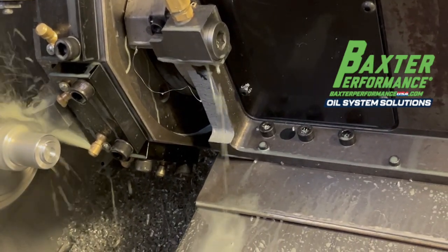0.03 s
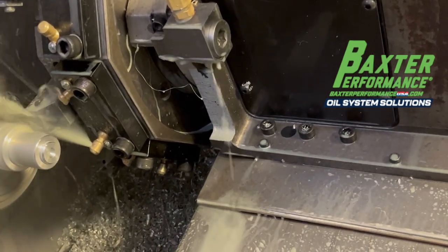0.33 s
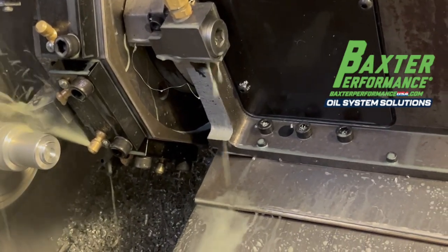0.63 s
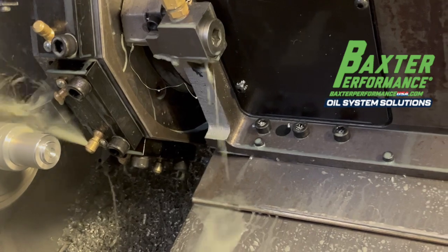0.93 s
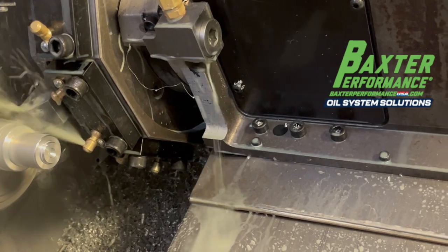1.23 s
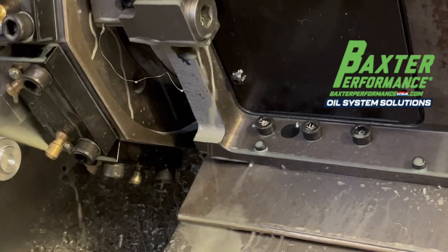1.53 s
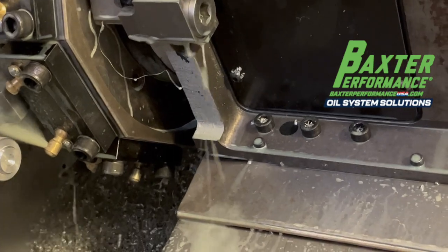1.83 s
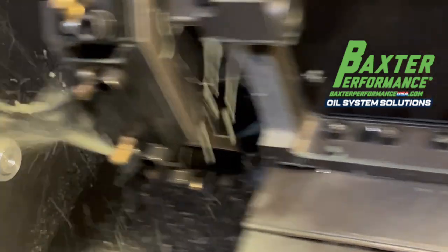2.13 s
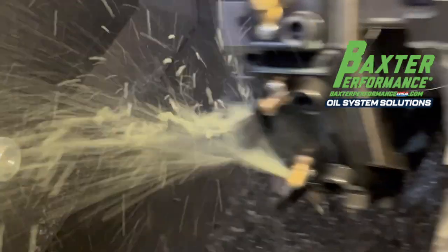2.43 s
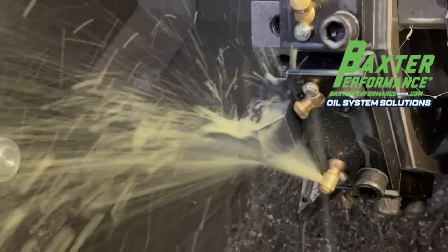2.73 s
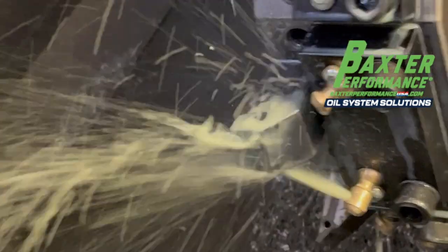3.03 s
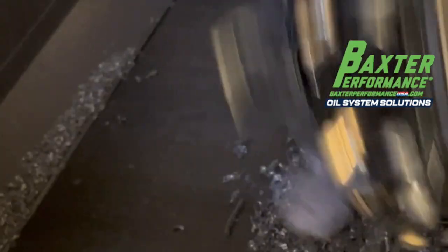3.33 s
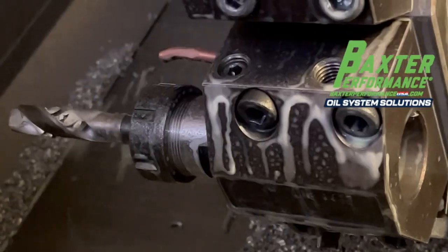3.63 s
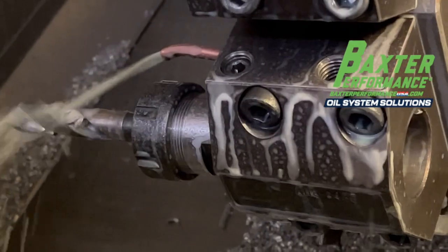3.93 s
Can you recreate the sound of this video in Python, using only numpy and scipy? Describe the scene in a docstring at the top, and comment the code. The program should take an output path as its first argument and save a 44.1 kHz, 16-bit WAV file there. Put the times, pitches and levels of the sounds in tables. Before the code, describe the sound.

Close inside a metal enclosure, a running lathe drones and whines as coolant sprays and a tool scrapes lightly. After a short squeal and a rumble comes a loud double clunk, then the hiss fades amid soft thuds.

```python
"""Inside a CNC lathe, on a close microphone pair. Two motors beat against each other under a pump whine,
while a tool cuts lightly in a jet of coolant. At 1.5 s the tool leaves the part with a squeal, the slide
backs away with a rumble and the jet fans out over the sheet-metal enclosure. At 2.3 s the turret unlocks
with a double clunk, and the recorder's gain dips. The jet's hiss dies down as the turret swings to the
next tool and seats with dull thuds."""
import sys
import numpy as np
from scipy import signal
from scipy.fft import rfft, irfft
from scipy.io import wavfile
from scipy.ndimage import uniform_filter1d, minimum_filter1d

SR = 44100
rng = np.random.default_rng(int(sys.argv[2]) if len(sys.argv) > 2 else 0)


def persist_wave(psi):
    """Save psi, clipped to +-1, as 16-bit WAV."""
    counts = np.round(np.clip(psi, -1, 1) * 32767).astype(np.int16)
    wavfile.write(sys.argv[1], SR, np.atleast_2d(counts).T)


N = 176400
TIME, FREQ = np.arange(N) / SR, np.fft.rfftfreq(N, 1 / SR)


def amp(db):
    """Decibels to gain."""
    return 10 ** (np.asarray(db) / 20)


def at_hz(points, hz=FREQ):
    """Reads a table on a log-frequency axis."""
    f, value = np.transpose(points)
    return np.interp(np.log(hz + 1), np.log(f + 1), value)


def fader(points):
    """Gain over time from (time [s], level [dB]) points."""
    return amp(np.interp(TIME, *np.transpose(points)))


def resonances(rows):
    """Gain over frequency of a few resonant peaks."""
    return sum(amp(db) / (1 + ((FREQ - hz) / (.78 * width)) ** 2) for hz, width, db in rows)


def shape(x, gain):
    """Filters by a gain over frequency."""
    return irfft(rfft(x) * gain, N)


def white():
    """Two unrelated noises of 0 dB/Hz: one shared by the microphones, one diffuse."""
    return rng.standard_normal((2, N)) * np.sqrt(SR / 2)


def wander(rate_hz):
    """Smooth random motion of unit size."""
    x = shape(rng.standard_normal(N), np.exp(-(FREQ / rate_hz) ** 2) * (FREQ > 0))
    return x / x.std()


def arch(start, length):
    """A smooth rise and fall."""
    return np.sin(np.pi * np.clip((TIME - start) / length, 0, 1))


def add(mix, start, sound):
    """Mixes a sound in at a time in seconds."""
    part = mix[:, round(start * SR):][:, :sound.shape[1]]
    part += sound[:, :part.shape[1]]


def ahead(sound):
    """A source straight ahead: all shared, nothing diffuse."""
    return np.array([sound, np.zeros(N)])


def tone(hz, db=0, waver_db=2.5, drift_turns=.048):
    """A machine tone that wavers a little in level and pitch."""
    turns = hz * TIME + rng.random() + drift_turns * wander(rate_hz=4.4)
    return np.sqrt(2) * amp(db + waver_db * wander(rate_hz=4.4)) * np.sin(2 * np.pi * turns)


# machine and workshop all around: (frequency [Hz], level [dB/Hz])
ROAR_SPECTRUM = [(15, -80), (35, -80), (70, -57), (150, -61.5), (260, -60.5), (480, -62.5), (750, -65.5),
                 (1100, -70.5), (2000, -72), (2700, -72), (3600, -72), (4900, -69), (5800, -77.5),
                 (6800, -81.5), (7600, -84), (9500, -86.5), (15500, -89)]

def workshop():
    """A steady roar with a slight flutter."""
    return shape(white(), amp(at_hz(ROAR_SPECTRUM))) * amp(.5 * wander(rate_hz=24))


# hum of the frame: (time [s], level [dB])
FRAME_LEVEL = [(0.0, -34), (0.15, -27), (0.37, -38.5), (0.7, -24.5), (1.22, -38.5), (1.44, -28.5),
               (1.68, -32), (1.8, -28.5), (1.95, -24), (2.15, -31.5), (2.5, -40), (3.22, -24.5),
               (3.73, -35), (4.0, -30.5)]
# steady tones of drives and pump: (pitch [Hz], level [dB])
HUM_TONES = [(119.7, -48.5), (251, -55.5), (268.2, -45.5), (278.9, -52.5), (329.9, -42.5), (361.5, -45.5),
             (411.7, -50), (430.4, -44.5), (565, -53), (613.5, -56), (669, -46), (697, -48), (727, -51.5),
             (864, -47.5), (1174, -56.5), (1311, -51.5)]

def hum():
    """The frame hums in slow swells under the tones of the drives and pump."""
    return tone(107.6, waver_db=2) * fader(FRAME_LEVEL) + sum(tone(hz, db) for hz, db in HUM_TONES)


# main motor, louder while the slide moves: (time [s], level [dB])
MOTOR_LEVEL = [(0, -25.2), (1.68, -24.5), (1.8, -21.5), (2.1, -18.5), (2.3, -18.5), (2.4, -24), (2.55, -20),
               (2.7, -20), (2.98, -24.5), (3.16, -15.5), (3.35, -24.5), (4, -23.5)]
# the spindle's low hum and its higher drone: (time [s], level [dB])
SPINDLE_LEVEL = [(0, -27.5), (1.7, -26.3), (1.9, -23.5), (2.15, -27), (2.4, -35), (3.3, -31), (4, -32)]
DRONE_LEVEL = [(0, -44), (.15, -32.5), (.48, -43), (.62, -33.5), (1.05, -38.5), (1.4, -35.5), (1.6, -44.5),
               (1.85, -33), (2.5, -44), (4, -40.5)]
MOTOR_HZ, SPINDLE_HZ, DRONE_HZ, IN_STEP_S = 59.76, 53.31, 214.7, .07

def motors():
    """Main motor and spindle hum a few hertz apart, so they beat under the spindle's drone."""
    phase_per_hz = 2 * np.pi * (TIME - IN_STEP_S)
    motor = fader(MOTOR_LEVEL) * np.cos(MOTOR_HZ * phase_per_hz)
    spindle = fader(SPINDLE_LEVEL) * np.cos(SPINDLE_HZ * phase_per_hz)
    return np.sqrt(2) * (motor + spindle) + tone(DRONE_HZ, waver_db=2.2) * fader(DRONE_LEVEL)


# pump whine: (time [s], level [dB])
PUMP_LEVEL = [(0, -34.5), (.35, -30.5), (.55, -28.5), (1.1, -27.5), (1.45, -31.5), (1.8, -43), (2.5, -36),
              (3.0, -34), (3.5, -34), (4, -39.5)]

def pump():
    """The pump whines on one pitch, loudest during the cut."""
    return tone(496.5, waver_db=.16) * fader(PUMP_LEVEL)


# turret drive and its servo: (pitch [Hz], level [dB])
TURRET_TONES = [(390.5, -35.5), (623.8, -38), (807.5, -44.5), (893.6, -56)]
SERVO_TONES = [(5131, -46.5), (5156, -48.5)]
# their swells: (time [s], level [dB])
TURRET_LEVEL = [(0, -22), (2.4, -8), (2.7, -1), (3.4, -3), (4, -6.5)]
SERVO_LEVEL = [(0, -17), (1.6, -7), (2.1, 3), (2.9, -0.5), (3.3, 1.5), (4, 0.5)]

def turret_drive():
    """The drive swells for the swing; its servo whistles on a close pair of unsteady tones."""
    drive = sum(tone(hz, db, waver_db=1.5) for hz, db in TURRET_TONES)
    servo = sum(tone(hz, db, waver_db=1.3, drift_turns=.42) for hz, db in SERVO_TONES)
    return drive * fader(TURRET_LEVEL) + servo * fader(SERVO_LEVEL)


# slide rumble: (frequency [Hz], level [dB/Hz]) and (time [s], level [dB])
SLIDE_SPECTRUM = [(15, -70), (30, -70), (45, -44), (62, -41), (90, -51.5), (140, -57), (280, -56),
                  (600, -68), (1500, -93)]
SLIDE_LEVEL = [(0, -24), (1.65, -8), (1.8, -4.5), (2.15, 4), (2.35, 2.5), (2.55, -6), (2.9, -1.5),
               (3.15, 0.5), (3.35, -11), (3.6, -6.5), (3.8, -2), (4, 0)]

def slide():
    """The slide rumbles as it moves."""
    return shape(white(), amp(at_hz(SLIDE_SPECTRUM))) * fader(SLIDE_LEVEL)


# ring of the spinning part: (pitch [Hz], width [Hz], level [dB/Hz])
PART_MODES = [(4245, 76, -64.5), (4780, 103, -67), (5135, 184, -68), (5250, 130, -70), (6250, 550, -83)]
# the tool's contact: (time [s], level [dB])
CONTACT_LEVEL = [(0, 1), (.2, 0), (.35, -5.5), (.7, -0.5), (1.1, 1), (1.45, 2.5), (1.6, 2.5), (1.66, -12),
                 (2.2, -23)]
# the part's squeal as the tool leaves: (pitch [Hz], level [dB])
SQUEAL_TONES = [(4312, -39), (4807, -42), (5017, -41.5), (5351, -49)]

def cut(repeat=.78):
    """The tool scrapes nearly the same roughness each turn, splitting the part's ring into close lines."""
    comb = np.sqrt(1 - repeat ** 2) / (1 - repeat * np.exp(-2j * np.pi * FREQ / SPINDLE_HZ))
    scrape = shape(white(), resonances(PART_MODES) * comb) * fader(CONTACT_LEVEL)
    squeal = sum(tone(hz, db, waver_db=1.5) for hz, db in SQUEAL_TONES)
    return scrape + ahead(squeal * arch(start=1.53, length=.11))


def drops(per_s=2500, power_share=.43, flicker_db=.7):
    """Tiny impacts of uneven size in a fine mist, near 0 dB/Hz, flickering with the jet."""
    size_db = np.minimum(rng.exponential(1, N), 4)
    lands = rng.random(N) < per_s / SR
    ticks = amp(size_db) * lands * rng.choice([-1., 1.], (2, N))
    impacts = np.sqrt(power_share * SR / 2) * ticks / ticks.std()
    mist = np.sqrt(1 - power_share) * white()
    return (impacts + mist) * amp(flicker_db * wander(rate_hz=39))


# the jet, and its spray on the walls: (frequency [Hz], level [dB/Hz])
JET_SPECTRUM = [(500, -86), (2000, -99), (2900, -76.5), (3700, -80), (5600, -84), (6200, -68.5),
                (6800, -75), (7500, -73.5), (9000, -75), (11000, -74.5), (13000, -80), (15500, -76.5)]
WALL_SPECTRUM = [(150, -77), (600, -60), (1250, -60), (2000, -64), (2600, -65.5), (4000, -73.5),
                 (6500, -79), (7400, -68), (9000, -99), (11000, -84), (15500, -86)]
# the flow of each: (time [s], level [dB])
JET_LEVEL = [(0, 2), (.2, 1.5), (.4, -1.5), (1.0, 0), (1.45, 1), (1.56, 0.5), (1.7, -1.5), (2.2, 4),
             (2.5, -2.5), (2.64, -2), (2.95, -4), (3.1, -12.5), (3.45, -6), (3.55, -18), (4, -16)]
WALL_LEVEL = [(0, -10), (.4, -20), (1.3, -10.5), (1.9, -8.5), (2.08, -1.5), (2.3, -1.5), (2.5, -6),
              (2.64, -6.5), (2.9, -12.5), (3.05, -9.5), (3.4, -9.5), (3.7, -13), (4, -7.5)]

def coolant():
    """The jet hisses, then drums on the enclosure."""
    hiss = shape(drops(), amp(at_hz(JET_SPECTRUM))) * fader(JET_LEVEL)
    drumming = shape(drops(), amp(at_hz(WALL_SPECTRUM))) * fader(WALL_LEVEL)
    return hiss + drumming


# panels around the microphones: (time [s], length [s], pitch [Hz], width [Hz], level [dB/Hz])
PANEL_SLAPS = [(1.434, .04, 7600, 2000, -68), (1.515, 0.1, 10900, 2500, -68.5),
               (2.74, 0.026, 7500, 5000, -74), (2.804, 0.18, 696, 450, -60), (2.808, 0.19, 1150, 398, -66),
               (2.846, 0.036, 7500, 5000, -72.5), (3.214, 0.05, 1550, 600, -63.5),
               (3.296, 0.083, 1590, 500, -61), (3.31, 0.037, 4220, 900, -67.5),
               (3.471, 0.036, 7500, 6000, -78.5), (3.516, .04, 1290, 200, -60),
               (3.922, 0.045, 2880, 2600, -67)]

def slaps():
    """Short flurries of coolant and swarf strike single panels."""
    return sum(arch(start, length) * shape(drops(), resonances([(hz, width, db)]))
               for start, length, hz, width, db in PANEL_SLAPS)


# the slide starts, the turret lifts and seats: (time [s], length [s], pitch [Hz], level [dB])
JOLTS = [(1.75, 0.11, 88, -30), (2.59, 0.11, 116, -29), (3.616, 0.09, 151, -32.5),
         (3.756, 0.059, 150, -28.5), (3.768, 0.1, 228, -35.5)]

def thuds():
    """Each jolt briefly sways one low mode of the frame."""
    return ahead(sum(arch(start, length) * tone(hz, db) for start, length, hz, db in JOLTS))


# blows of the unlocking turret, close by: (time [s], level [dB])
TURRET_BLOWS = [(2.333, 2.5), (2.347, -6), (2.356, -4), (2.364, 3.5), (2.371, 2.5), (2.383, -2.5),
                (2.394, -6.5), (2.418, -5), (2.442, -10)]
# the enclosure's ring: (frequency [Hz], level [dB/Hz]) and (frequency [Hz], t60 [s])
RING_SPECTRUM = [(30, -57), (110, -44.5), (330, -47.5), (700, -39.5), (1000, -45.5), (1500, -42),
                 (2000, -49), (4000, -56), (5800, -55), (7500, -56.5), (10000, -58), (15500, -67.5)]
RING_T60 = [(100, 0.76), (500, 0.29), (1500, 0.26), (4000, 0.26), (12000, 0.12)]
# modes of the casting and of the turret's coupling: (pitch [Hz], relative level [dB], t60 [s])
CASTING_MODES = [(122, 0, .4), (239, -5, .36), (350, -2, .16), (450, -4, .16), (560, 0, .14), (635, -3, .2),
                 (815, -8, .25), (926, -7, .25), (1028, -7, .25), (1265, -7, .23), (1445, -3, .22),
                 (1528, 0, .22)]
COUPLING_MODES = [(375, -2.5, .085), (515, -4.5, .055)]
CASTING_DB, CRACK_DB, CRACK_S = -3, -21, .0039

def clunk():
    """Each blow cracks and rings the casting and the enclosure; the first also knocks the coupling."""
    out, t = np.zeros((2, N)), TIME[:SR // 2]
    for start, db in TURRET_BLOWS:
        noise = shape(white(), amp(at_hz(RING_SPECTRUM)))[:, :len(t)]
        band_hz, age, bands = signal.stft(noise, SR, nperseg=256)
        decay = amp(-60 * age / at_hz(RING_T60, band_hz)[:, None])
        ring = signal.istft(bands * decay, SR)[1][:, :len(t)]
        crack = 1 + amp(CRACK_DB) * np.exp(-t / CRACK_S)
        casting = sum(amp(level - 60 * t / t60) * np.sin(2 * np.pi * (hz * t + rng.random((2, 1))))
                      for hz, level, t60 in CASTING_MODES)
        blow = ring * crack + amp(CASTING_DB) * casting / abs(casting).max()
        add(out, start, amp(db) * blow * np.minimum(t / .002, 1))
    knock = sum(amp(db - 60 * t / t60) * np.sin(2 * np.pi * hz * t) for hz, db, t60 in COUPLING_MODES)
    knock *= np.minimum(t / .0027, 1)
    add(out[:1], TURRET_BLOWS[0][0], knock[None])  # shared part only
    return out


# the microphone pair inside the enclosure: (frequency [Hz], coherence [0-1])
PAIR_COHERENCE = [(50, .98), (130, .96), (350, .92), (600, .9), (1150, .7), (1950, .3), (2400, 1),
                  (4500, 1), (5350, .78), (5600, 1), (8150, 1), (8350, .68), (8800, .64), (9400, 1),
                  (10300, 1), (10600, .72), (11300, .62), (11900, .97), (13000, .95), (13600, .55),
                  (14100, .65), (14400, 1)]
# (frequency [Hz], phase lead of the left [rad])
PAIR_LEAD = [(60, -.08), (240, -.2), (370, -.6), (700, -.45), (1200, -.6), (1800, -2.3), (2200, 0),
             (4650, 0), (5200, -.8), (5600, -3.14), (6700, -3.14), (6800, 0), (8200, 0), (8350, 1.3),
             (9300, 3.14), (10350, 3.14), (11700, 6.28), (13250, 6.35), (14350, 9.42)]
# (frequency [Hz], left minus right [dB])
PAIR_BALANCE = [(270, 0), (500, -3.5), (750, -1.5), (1080, -3.3), (1700, 5.5), (2100, 0)]

def scene():
    """All sources reach the close pair as a shared part and a diffuse part."""
    drives = ahead(hum() + motors() + pump() + turret_drive())
    shared, diffuse = rfft(drives + workshop() + slide() + cut() + coolant() + slaps() + thuds() + clunk())
    coherence = np.clip(at_hz(PAIR_COHERENCE), 0, 1)
    shared *= np.sqrt((1 + coherence) / 2)
    diffuse *= np.sqrt((1 - coherence) / 2)
    balance = amp(at_hz(PAIR_BALANCE))
    left = (shared + diffuse) * balance
    right = (shared - diffuse) * np.exp(-1j * at_hz(PAIR_LEAD))
    return irfft(np.array([left, right]) * np.sqrt(2 / (1 + balance ** 2)), N)


THRESHOLD_DB, SQUEEZE, HOLD_S, RECOVER_DB_PER_S = -14.5, .74, .095, 50
CEILING, BAND_EDGE_HZ = .92, 15650

def record(dry):
    """The recorder: gain control that ignores low hum, holds and recovers; a peak limiter; a band limit."""
    sensed = signal.sosfilt(signal.butter(2, 200, "high", fs=SR, output="sos"), dry)
    power_db = 10 * np.log10(abs(uniform_filter1d((sensed ** 2).mean(0), size=400)) + 1e-12)
    room_db = np.minimum(THRESHOLD_DB - power_db, 0)
    half_hold = int(HOLD_S * SR / 2)
    held_db = -minimum_filter1d(room_db, 2 * half_hold + 1, origin=half_hold) * SQUEEZE
    recovery_db = TIME * RECOVER_DB_PER_S
    dip_db = np.maximum.accumulate(held_db + recovery_db) - recovery_db
    ducked = dry * amp(-uniform_filter1d(dip_db, size=200))
    peak_gain = CEILING / np.maximum(abs(ducked).max(0), CEILING)
    limited = ducked * uniform_filter1d(minimum_filter1d(peak_gain, size=129), size=129)
    lowpass = signal.firwin(801, BAND_EDGE_HZ, window=("kaiser", 9), fs=SR)
    return signal.oaconvolve(limited, lowpass[None], "same")


dry = scene()
out = record(dry)
persist_wave(out)
```